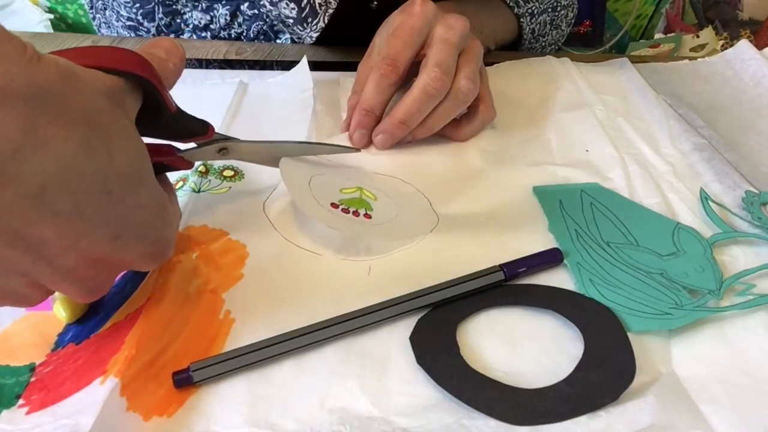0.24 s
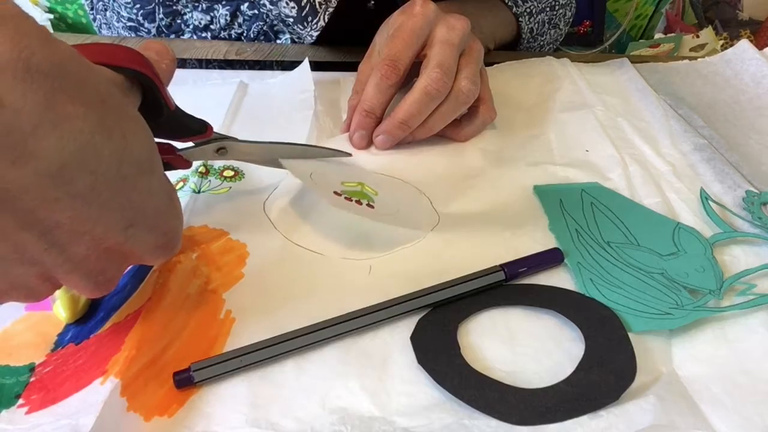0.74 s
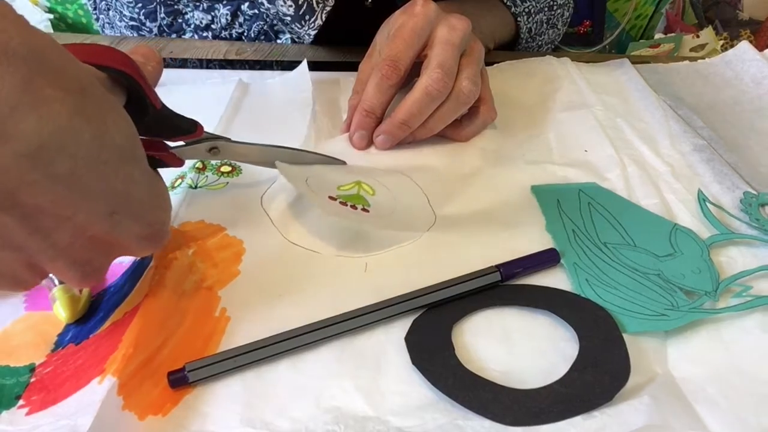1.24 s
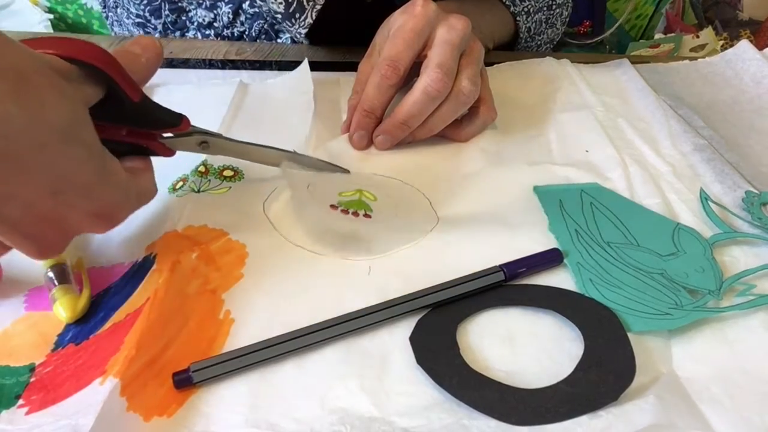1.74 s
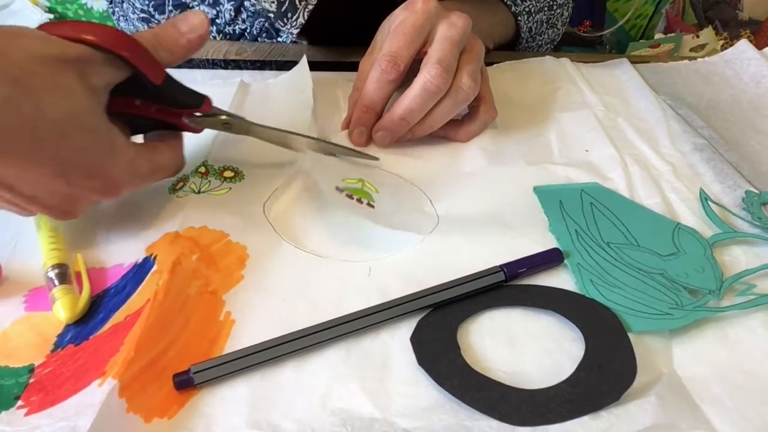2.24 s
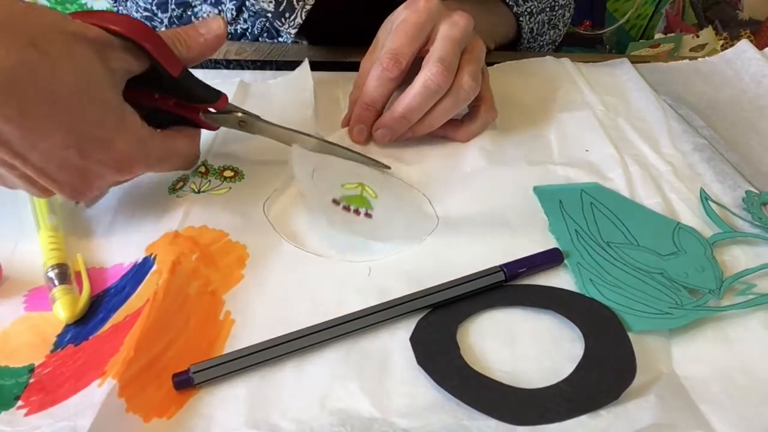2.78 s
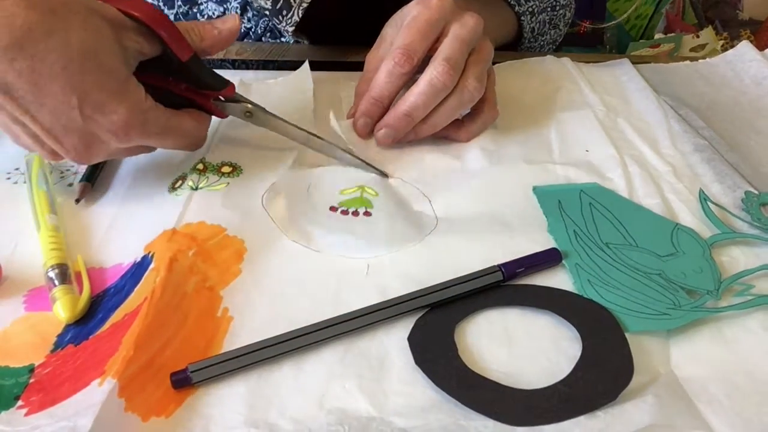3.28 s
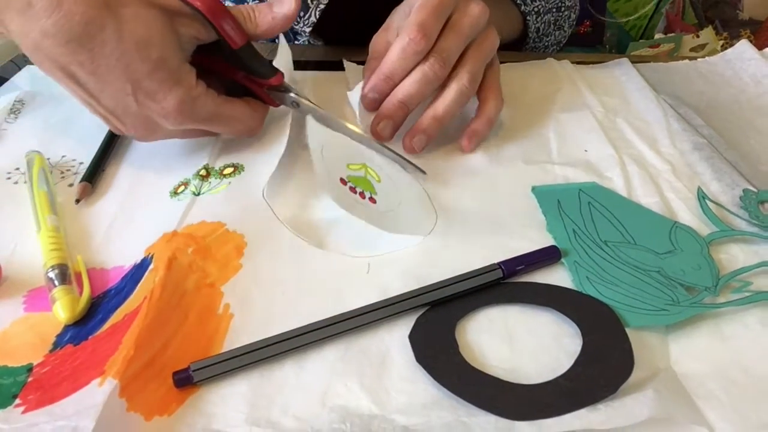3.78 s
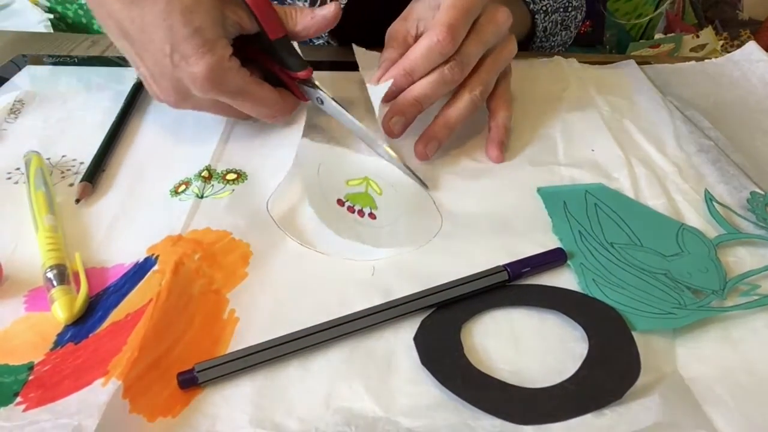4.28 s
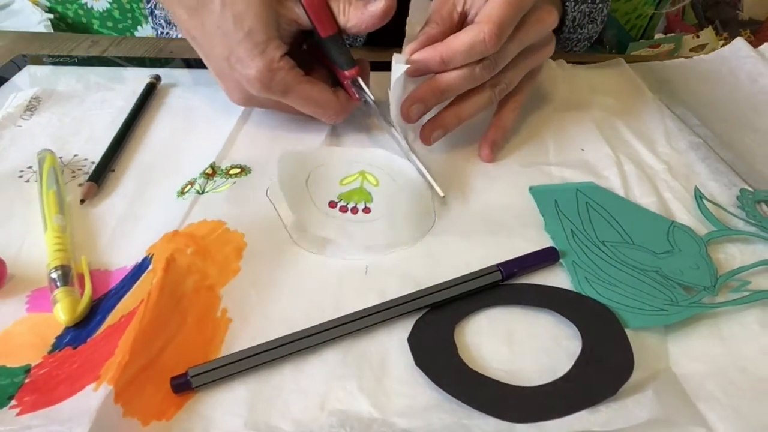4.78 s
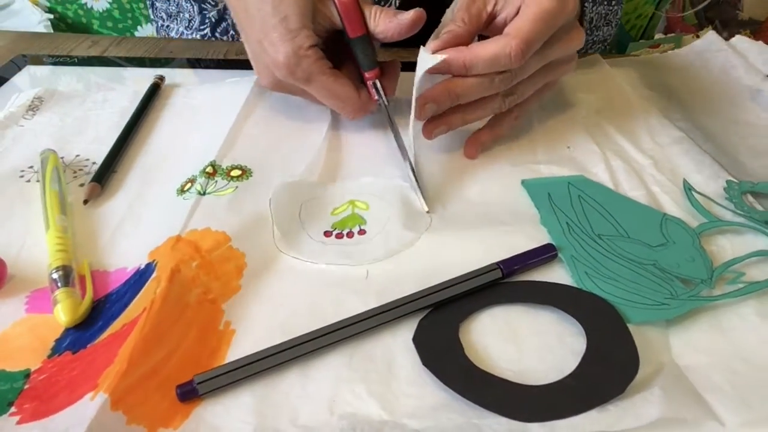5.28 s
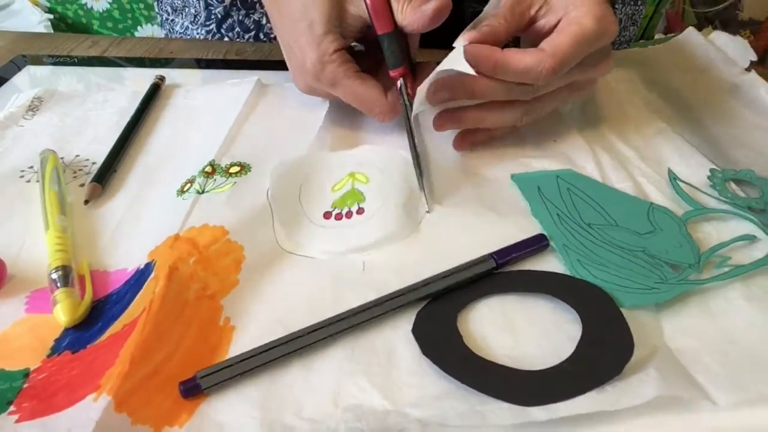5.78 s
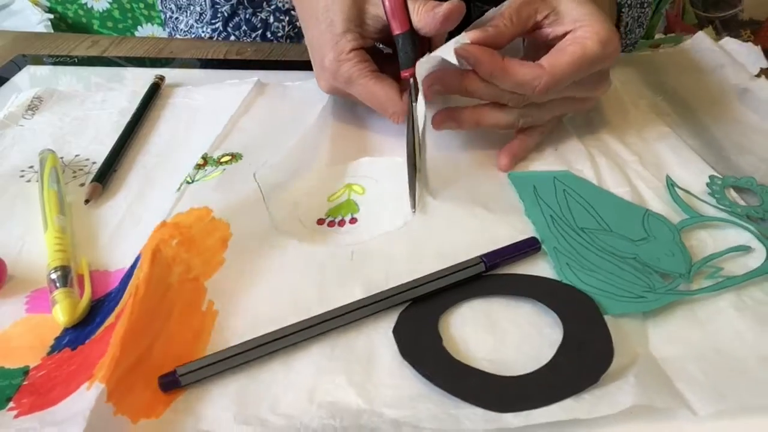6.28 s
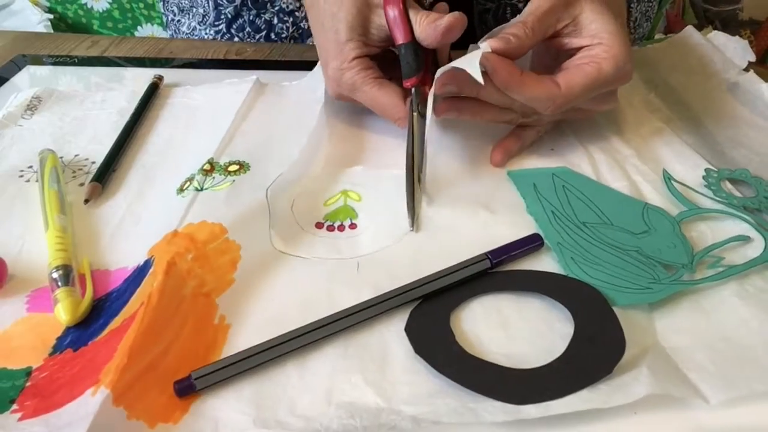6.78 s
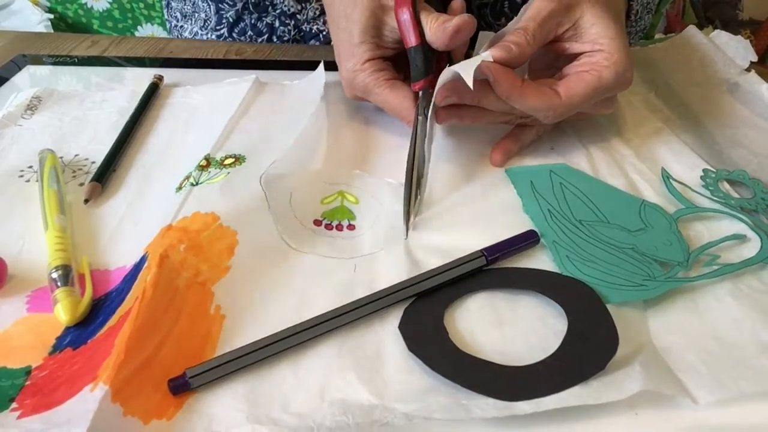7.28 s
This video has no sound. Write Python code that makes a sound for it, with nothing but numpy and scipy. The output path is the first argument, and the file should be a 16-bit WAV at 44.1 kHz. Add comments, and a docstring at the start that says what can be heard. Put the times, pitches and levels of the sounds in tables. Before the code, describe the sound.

Tissue paper crinkles and snaps as scissors cut through it, the blades tapping and scraping softly on wood in a quiet room.

```python
"""Scissors cutting tissue paper

Thin paper lies on a board in a small furnished room, heard from close by. Its creases snap as
short, bright cracks over a fine rustle. The blades knock and drag on the board, which rings with
low wooden tones. The table rumbles under the hands, and the room hisses quietly."""
import sys
import numpy as np
from scipy import signal
from scipy.fft import rfft, irfft
from scipy.io import wavfile
from scipy.ndimage import uniform_filter1d

SR = 44100
rng = np.random.default_rng(int(sys.argv[2]) if len(sys.argv) > 2 else 0)


def generate_wav(sig):
    """Save sig (samples, or channels by samples) to the path in sys.argv[1] as 16-bit PCM at SR."""
    pcm = np.round(np.clip(np.atleast_2d(sig).T, -1, 1) * 32767).astype(np.int16)
    wavfile.write(sys.argv[1], SR, pcm)


N = 332073
TIME = np.arange(N) / SR


def gain(db):
    """Turn decibels into a number to multiply by."""
    return 10 ** (np.asarray(db) / 20)


def unit(x):
    """Scale a sound to an average power of 1."""
    return x / np.sqrt(np.mean(x ** 2))


def band(x, lo_hz, hi_hz, order=2):
    """Keep the frequencies between two limits."""
    sos = signal.butter(order, [lo_hz, min(hi_hz, .45 * SR)], "band", fs=SR, output="sos")
    return signal.sosfilt(sos, x)


def colour(x, spectrum, size=4096):
    """Shape the tone of a sound by (f/Hz, level/dB) points."""
    hz, db = np.transpose(spectrum)
    bin_hz = np.arange(size // 2 + 1) * SR / size
    cepstrum = irfft(np.interp(np.log(bin_hz + 1), np.log(hz), db) * np.log(10) / 20)
    cepstrum[1:size // 2] *= 2  # fold forward in time, so nothing rings before a hit
    cepstrum[size // 2 + 1:] = 0
    response = irfft(np.exp(rfft(cepstrum)))
    return signal.fftconvolve(x, response / np.linalg.norm(response))[:N]


def wander(per_s):
    """Glide to a new random value per_s times a second."""
    step = int(SR / per_s)
    return uniform_filter1d(np.repeat(rng.standard_normal(N // step + 1), step), step)[:N]


def swells(base_db, times, peaks_db, rise_s, fall_s):
    """A level in dB that rises before each event and fades after it."""
    t = TIME[::64]
    after = t - np.asarray(times)[:, None]
    shapes = np.exp(-2 * np.where(after < 0, -after / rise_s, after / fall_s))
    power = np.interp(TIME, t, gain(peaks_db) ** 2 @ shapes)
    return 10 * np.log10(gain(base_db) ** 2 + power)


def facet_ring(x, pick, middle_hz=5200, width_hz=900):
    """A small stiff patch rings briefly; pick sets its pitch, up to an octave from the middle."""
    hz = middle_hz * 2 ** (0.5 * np.clip(pick, -2, 2))
    pole = np.exp(-np.pi * width_hz / SR)
    feedback = [1, -2 * pole * np.cos(2 * np.pi * hz / SR), pole ** 2]
    return signal.lfilter([1 - pole, 0, pole - 1], feedback, x)


def bursts(times, gains, lengths_ms, rise_share, grain_db, snap=0., ring_db=-60.):
    """Grainy puffs of noise that swell and fade; one track for each column of gains."""
    size, lead = 2400, 800  # samples: in all, and before the peak
    ms = (np.arange(size) - lead) / SR * 1000
    from_peak = np.where(ms < 0, -ms / rise_share, ms / (1 - rise_share))
    tracks = np.zeros((gains.shape[1], N + size))
    for t, strength, length in zip(times, gains, np.maximum(lengths_ms, .3)):
        chance = rng.standard_normal(size)
        noise = rng.standard_normal((len(tracks), size))
        swell = 10 ** (-.4 * from_peak / length)
        swell *= 1 + snap / length * (ms >= 0) * 10 ** -np.abs(ms)  # short ones crack hardest
        bounce = np.roll(noise, int(abs(chance[1]) * 10) + 2, axis=1)  # echo off the board below
        grain = gain(grain_db * np.repeat(chance[::16], 16))
        burst = (noise + bounce) * swell * grain
        for pick in chance[2:5]:
            burst += gain(ring_db) * facet_ring(burst, pick)
        burst *= np.linalg.norm(swell) / np.linalg.norm(burst, axis=1, keepdims=True)
        start = int(t * SR)
        tracks[:, start:start + size] += strength[:, None] * burst
    return tracks[:, lead:lead + N]


# The tone of the room's hiss: f/Hz, relative level/dB
HISS_TONE = [(15, -22), (27, -8.5), (90, -7.5), (110, -9), (229, -14), (718, -19.5), (7700, -55),
             (16500, -71)]
def room_hiss(level_db=-75.5):
    """Quiet, steady noise, strongest in the bass."""
    return gain(level_db) * colour(rng.standard_normal(N), HISS_TONE)


# The room's echo, band by band: f/Hz, time to fade by 60 dB/s, relative level/dB
ECHO_BANDS = [(187, 0.33, -1.5), (738, 0.32, -8), (2300, 0.23, -12), (5800, 0.17, -18.5)]
def room_echo(x, gap_s=.004):
    """The room returns a soft blur of sound after a short gap; the treble dies first."""
    t = np.arange(SR // 2) / SR
    tail = 0
    for hz, fade_s, db in ECHO_BANDS:
        part = band(rng.standard_normal(len(t)), hz * 0.52, hz * 1.815) * 1000 ** (-t / fade_s)
        tail += 2 * gain(db) * np.sqrt(hz / SR) * part / np.linalg.norm(part)
    return signal.fftconvolve(x, tail * (t > gap_s))[:N]


# The hands lean on the table twice: t/s, level/dB
HAND_LEANS = [(5.76, -59.5), (6.12, -60)]
def table_rumble(start_db=-89, rise_db_per_s=2.25):
    """The table top hums at its lowest tone, louder as the hands press on it."""
    times, peaks_db = np.transpose(HAND_LEANS)
    db = swells(start_db + rise_db_per_s * TIME, times, peaks_db, rise_s=0.05, fall_s=0.052)
    return gain(db + 2 * wander(14)) * unit(band(rng.standard_normal(N), 46, 84, order=1))


# Steady handling between snaps and knocks: t/s, paper rustle level/dB, blade drag level/dB
HANDLING = [(0.0, -84.5, -103), (0.63, -81, -84), (0.84, -73.5, -56), (1.3, -76, -66.5), (1.72, -81.5, -86),
            (1.91, -63.5, -65), (2.35, -78, -76), (2.52, -72, -75), (3.12, -67.5, -85),
            (3.84, -61.5, -71.5), (4.19, -70.5, -55), (4.53, -52.5, -86), (4.76, -60.5, -89),
            (5.18, -65, -71), (5.47, -67, -73), (5.68, -57.5, -64.5), (6.86, -61.5, -63),
            (7.53, -70.5, -65)]
def handling():
    """How strongly the hands rustle the paper and drag the blade at each moment, in dB."""
    times, rustle_db, drag_db = np.transpose(HANDLING)
    return np.interp(TIME, times, rustle_db), np.interp(TIME, times, drag_db)


# The board's tones, damped by hands and paper: f/Hz, relative level/dB, time to fade by 60 dB/s
BOARD_TONES = [(193.7, -5, 0.055), (321, -4, 0.028), (441, -5, 0.054), (703, -1.5, 0.016),
               (805.4, -3.5, 0.055), (895, -6, 0.061), (1055, -4, 0.03), (1162, -11.5, 0.026),
               (1401, -3, 0.018), (1472, 2.5, 0.027), (1588, 4, 0.009), (1880, -10, 0.024),
               (2360, 1, 0.0037)]
def board_ring(low_push, high_push, split_hz=1150):
    """Pushed wood rings at its own tones; those below and above the split each get their own push."""
    lower = [tone for tone in BOARD_TONES if tone[0] < split_hz]
    upper = [tone for tone in BOARD_TONES if tone[0] >= split_hz]
    wood = 0
    for push, tones in ((low_push, lower), (high_push, upper)):
        for k, (hz, db, fade_s) in enumerate(tones):
            pole = np.exp(2j * np.pi * hz / SR - np.log(1000) / (fade_s * SR))
            wood += (-1) ** k * gain(db) * signal.lfilter([1], [1, -pole], push).imag
    return band(wood, 136, 2700)  # the board is too small to give off deep bass


# The blades knock on the board: t/s, relative level/dB, share for the upper tones/dB
BLADE_KNOCKS = [(0.623, -56, 0), (0.6755, -55.5, 0), (0.81, -56, -5), (0.887, -51, -3), (1.1375, -52, -15),
                (1.1891, -52, -14), (1.2164, -45, -2), (1.2859, -47.5, -1), (1.506, -37, -1),
                (1.5366, -41.5, -2.5), (1.7803, -39, -5), (1.8201, -46, -22), (2.0038, -31, -0.5),
                (2.0401, -48.5, -11), (2.605, -52.5, -4.5), (2.6782, -47, -3), (2.85, -40, 0),
                (2.986, -42, -2.5), (3.0927, -38.5, -3), (3.2068, -37.5, -4), (3.2492, -41.5, -3),
                (3.444, -29, -1), (3.938, -43.5, 3.5), (3.9823, -38, -1.5), (4.0367, -44, 0),
                (4.1811, -38.5, -0.5), (4.201, -48, 13), (4.2253, -39, -2), (4.258, -40, 1.5),
                (4.3783, -39.5, -5), (4.5564, -31, -0.5), (4.9606, -41, -1), (5.0162, -48, 5),
                (5.0714, -42, -1), (5.1586, -43, -1), (5.2052, -43.5, 6), (5.231, -44, 4),
                (5.463, -41.5, -1), (5.51, -45, -12), (7.0282, -43.5, -4), (7.2774, -37.5, -2),
                (7.5206, -32, -2.5)]
def blades_on_board(steady_db, contact_ms=6.8):
    """Knocks and the stuttering drag of the lower blade make the board ring."""
    times, db, upper_db = np.transpose(BLADE_KNOCKS)
    lower_share = np.sqrt(np.clip(1 - gain(upper_db) ** 2, .03, 1))
    gains = gain(db)[:, None] * np.transpose([lower_share, gain(upper_db)])
    low, high = bursts(times, gains, np.full(len(times), contact_ms), rise_share=0.5, grain_db=6)
    # every knock sets the blade chattering
    drag_db = swells(steady_db, times, -20.5 + 0.6 * db, rise_s=0.01, fall_s=0.045)
    stutter_db = 4 * wander(50)
    drag = gain(drag_db + stutter_db) * rng.standard_normal(N)
    return board_ring(gain(-22.5) * low + gain(-32) * drag, gain(-19.5) * high + gain(-38.5) * drag)


# The tone of tissue paper: f/Hz, relative level/dB
PAPER_TONE = [(410, -3.5), (700, -7), (1300, -5.5), (2310, -8), (3550, -5), (4800, -7), (7900, -3),
              (10700, -4), (15000, -0.5)]
def paper_tone(x):
    """Give a sound the bright tone of the thin sheet."""
    return colour(x, PAPER_TONE)


def paper_rustle(steady_db, cracks_per_s=220, fade_ms=2.5):
    """Tiny cracks, some dull and some bright, over the hiss of paper sliding on paper."""
    times, db, _, lengths_ms = np.transpose(CREASE_SNAPS)
    stir_db = -32 + 0.77 * (db + 10 * np.log10(lengths_ms))  # each snap stirs the sheet around it
    rustle_db = swells(steady_db, times, stir_db, rise_s=0.0047, fall_s=0.031)
    fade = 10 ** (-np.arange(800) / SR * 1000 / fade_ms)
    cracks = 0
    for lo_hz, hi_hz in ((900, 5000), (2500, 10000), (5000, 19000)):
        size_db = np.minimum(3.5 * rng.exponential(size=N), 7)
        clicks = (rng.random(N) < cracks_per_s / SR) * gain(size_db)
        crackle = signal.fftconvolve(clicks, fade)[:N] * rng.standard_normal(N)
        cracks += band(crackle, lo_hz, hi_hz, order=1) / np.sqrt(hi_hz)
    flurry_db = 3.2 * wander(60)
    slide = band(rng.standard_normal(N), 920, 4670, order=1)
    return gain(rustle_db + flurry_db) * paper_tone(gain(4) * unit(cracks) + unit(slide))


# Creases snap: t/s, relative level/dB, body (the middle pitches) against treble/dB, length/ms
CREASE_SNAPS = [(0.1306, -58, 5.5, 1.5), (0.196, -59.5, 15.5, 2.4), (0.209, -66, 8, 2.6),
                (0.2335, -60.5, 19.5, 3), (0.62, -54, 2, 2.8), (0.6735, -51, 9.5, 5.3),
                (0.8042, -58, 13, 4.7), (0.879, -52.5, 8.5, 10.6), (0.931, -50.5, 6.5, 9.3),
                (1.026, -53.5, 8, 7.7), (1.063, -58.5, 10.5, 4.4), (1.098, -34.5, -9, 0.71),
                (1.1164, -43, -6, 0.51), (1.131, -49.5, 9, 3.2), (1.175, -50, -5, 2),
                (1.186, -46.5, 4, 9.8), (1.2085, -44, 1, 3.4), (1.219, -41, 1.5, 4.7), (1.238, -44, 3, 1.8),
                (1.2861, -35.5, -3, 5.1), (1.306, -52, -6, 1.1), (1.333, -38.5, -6, 1.3),
                (1.395, -52, 4.5, 1.8), (1.414, -37, -2, 11.5), (1.4316, -33.5, 1, 0.42),
                (1.507, -45.5, -5, 12), (1.531, -48.5, -10, 11), (1.69, -54, 8.5, 0.7),
                (1.76, -37.5, -20, 0.28), (1.78, -40.5, -14, 2), (1.817, -28, -5.5, 3.3),
                (1.9555, -45.5, 6, 2), (1.979, -45, 1.5, 8.3), (2.0028, -39.5, -0.5, 0.9),
                (2.0984, -46.5, -18, 3.6), (2.273, -51, -24, 3), (2.3014, -36.5, -11, 4.5),
                (2.3155, -45.5, 1, 12), (2.344, -39, 0, 2.4), (2.357, -46.5, -10, 30),
                (2.4298, -35, -28, 2.1), (2.44, -45, -15, 2), (2.461, -50, -6, 3), (2.53, -38, -4, 0.99),
                (2.5524, -36.5, 1, 1.8), (2.5881, -32.5, -12, 1.6), (2.6074, -40, 8.5, 0.95),
                (2.6357, -41.5, 12.5, 0.91), (2.67, -39, -17, 5.1), (2.738, -41, 0, 1.3),
                (2.75, -47, 9, 1.9), (2.7854, -42.5, -2, 1.7), (2.8137, -46, -10, 1.5),
                (2.8409, -36, -5.5, 2.5), (2.849, -36.5, -8, 2.7), (2.9673, -36, -12, 2),
                (3.007, -39, -4, 4.5), (3.092, -43.5, 11.5, 3.8), (3.126, -48, 6, 2.8),
                (3.204, -41, -0.5, 2.3), (3.247, -26, -13, 2.6), (3.291, -26.5, -5.5, 7.8),
                (3.301, -48, -24, 3), (3.467, -39, -0.5, 4.6), (3.503, -33.5, -20, 1.4),
                (3.632, -47.5, 4, 12), (3.65, -45, -10, 2.3), (3.712, -55, -1.5, 19),
                (3.814, -54.5, -3, 10), (3.845, -60, -6, 1), (3.8625, -38, -14, 1.1), (3.9124, -40, -25, 3),
                (3.991, -40.5, -2, 3.8), (4.056, -46.5, -4, 1.9), (4.114, -39.5, -18, 5.2),
                (4.132, -40, -5, 4.1), (4.174, -36, -5, 4.2), (4.2025, -40, -24, 1.5),
                (4.2214, -38, -9, 4.8), (4.359, -34.5, -10, 3.6), (4.3783, -34, -1, 12),
                (4.4094, -34.5, 7.5, 6.6), (4.42, -32.5, -23, 4.7), (4.43, -37, -22, 2.2),
                (4.455, -22.5, 2, 0.47), (4.464, -40, -7, 4.2), (4.4794, -26.5, -25, 0.73),
                (4.5184, -27, -4.5, 4.5), (4.609, -36.5, -17, 2.3), (4.7297, -35.5, -9, 4),
                (4.91, -44.5, 3, 1.3), (4.924, -43, 6, 2.7), (4.957, -28, -10, 3.4),
                (5.008, -43.5, -16, 6.5), (5.082, -39.5, 2, 4.6), (5.0942, -36.5, 1, 0.99),
                (5.1946, -30, -6, 1.2), (5.2283, -42, -11, 6.6), (5.242, -37.5, -20, 1.4),
                (5.462, -35.5, -21, 2.4), (5.4763, -39.5, -1.5, 2.2), (5.509, -32, -13, 3.6),
                (5.5192, -45, -15, 3.7), (5.5733, -32, 7.5, 2.9), (5.582, -39, -13, 4.6),
                (5.626, -35, -12, 0.98), (5.729, -37.5, 1, 8), (5.749, -26, -7, 2.5),
                (5.81, -20.5, -38, 0.62), (5.82, -49, -23, 2.8), (5.8918, -35.5, -6, 5.1),
                (5.968, -33.5, -1, 1.1), (5.993, -55, 17, 2.1), (6.0376, -33, -2, 3.9),
                (6.05, -36.5, 1, 3.9), (6.0664, -35, -14, 4.7), (6.134, -51.5, 7, 3.8),
                (6.203, -44.5, -10, 4.8), (6.227, -35, -12, 3.3), (6.2404, -39, -22, 0.84),
                (6.2574, -39.5, -0.5, 8.9), (6.3083, -32.5, 3, 2.4), (6.335, -23, -13, 0.5),
                (6.357, -34.5, -3, 2.4), (6.38, -36, -2, 6.5), (6.398, -41.5, 4, 7),
                (6.4714, -28.5, -4.5, 0.79), (6.5479, -36.5, 2, 11.5), (6.582, -33.5, 1, 5.8),
                (6.622, -41, -1, 1.9), (6.74, -42, 0, 8.1), (6.7506, -38.5, 2, 7.6), (6.778, -41.5, 0, 2),
                (6.7933, -44, -4, 1.5), (6.85, -43, -1, 3.2), (6.859, -42.5, 8.5, 2.7),
                (6.902, -26.5, -3, 1.7), (6.91, -33, -12, 3), (6.9734, -42, 8, 1), (7.027, -45, 6, 3.8),
                (7.069, -30.5, -2.5, 2.3), (7.0838, -44.5, 14, 1.4), (7.1408, -45.5, 3.5, 3.8),
                (7.1767, -43, 5.5, 1.1), (7.2108, -37.5, -15, 0.11), (7.239, -45.5, 8.5, 4.7),
                (7.2764, -34.5, -5, 13), (7.319, -37, -3, 9.7), (7.3276, -25.5, -18, 1.6),
                (7.495, -32, -13, 4.1), (7.5115, -27.5, -2, 5.3)]
def crease_snaps():
    """Each fold of the paper buckles in a flurry of tiny cracks; broad folds have more body."""
    times, db, body_db, lengths_ms = np.transpose(CREASE_SNAPS)
    gains = gain(np.transpose([db, db + body_db]))
    treble, body = bursts(times, gains, lengths_ms, rise_share=0.27, grain_db=4, snap=1.1, ring_db=-1)
    return paper_tone(gain(2.5) * band(treble, 5530, 12900) + gain(5) * band(body, 1290, 4000))


def scene():
    """Add paper, board, table and room together in one channel."""
    rustle_db, drag_db = handling()
    cutting = crease_snaps() + paper_rustle(rustle_db) + blades_on_board(drag_db)
    return (cutting + room_hiss() + room_echo(cutting) + table_rumble())[None]


def record(dry, top_hz=16300):
    """Cut away the very highest treble."""
    return signal.sosfilt(signal.ellip(8, .2, 70, top_hz, fs=SR, output="sos"), dry)


dry = scene()
out = record(dry)
generate_wav(out)
```